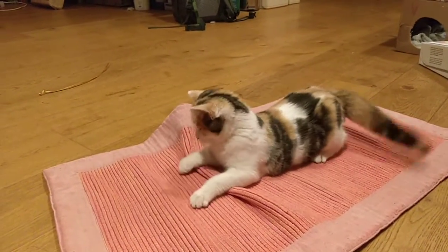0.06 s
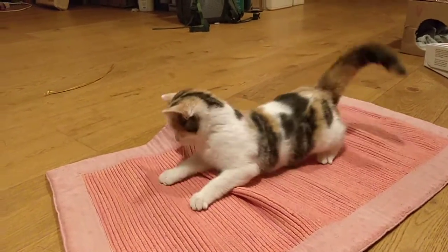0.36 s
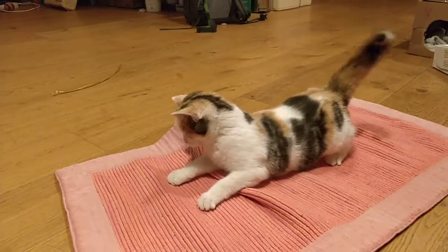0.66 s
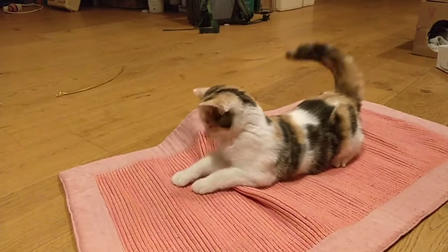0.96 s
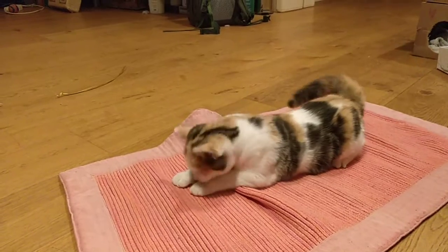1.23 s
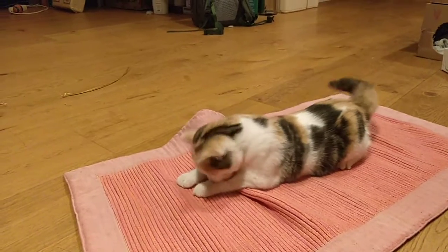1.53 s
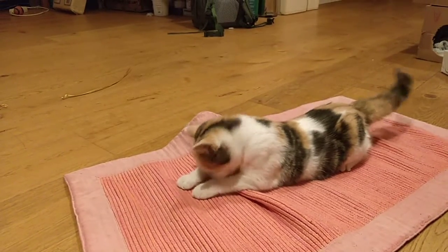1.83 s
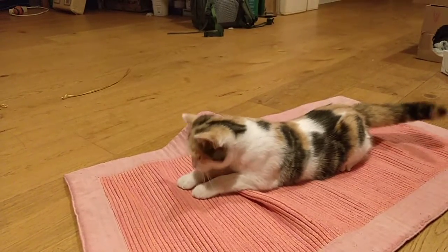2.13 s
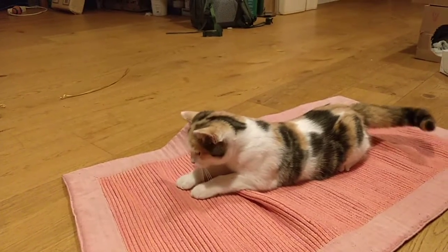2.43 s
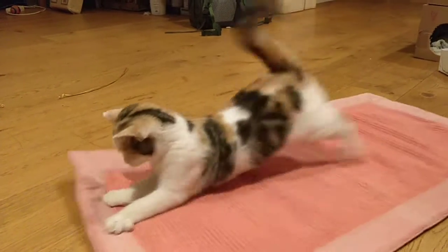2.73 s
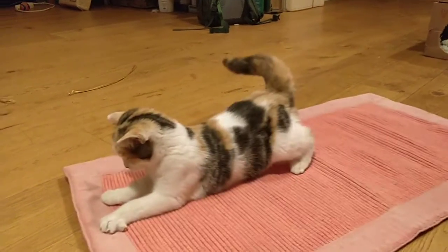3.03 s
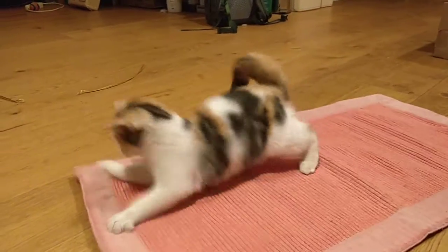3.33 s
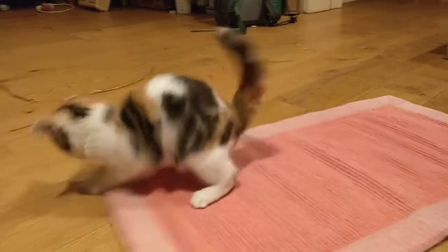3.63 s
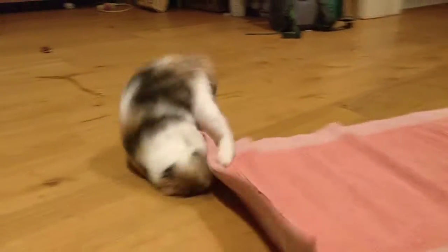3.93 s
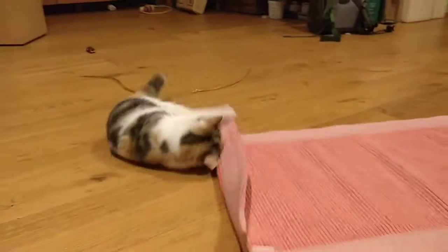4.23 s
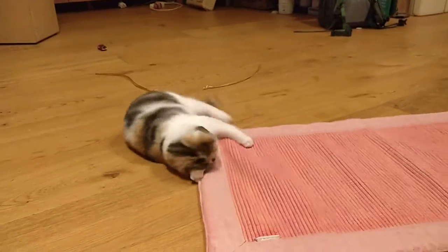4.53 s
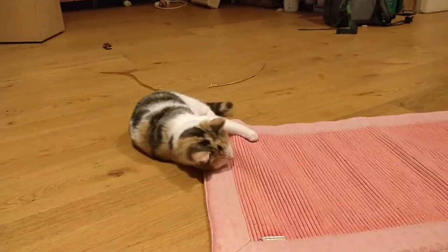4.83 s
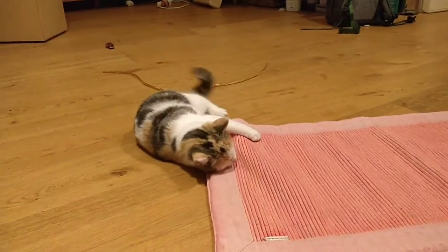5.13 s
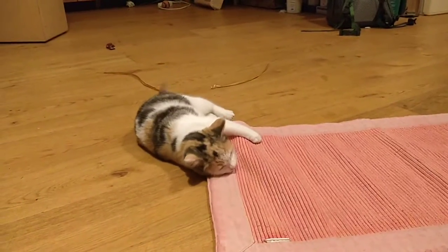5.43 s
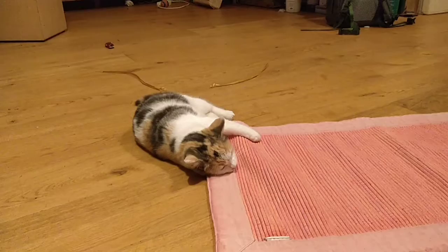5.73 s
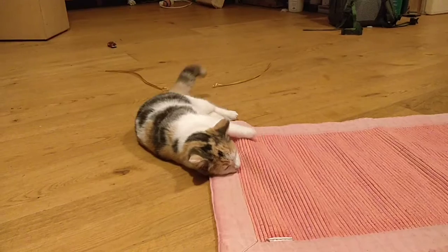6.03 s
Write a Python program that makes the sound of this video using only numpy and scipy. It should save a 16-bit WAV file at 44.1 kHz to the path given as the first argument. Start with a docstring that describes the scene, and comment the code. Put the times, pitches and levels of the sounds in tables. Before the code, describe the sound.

In a quiet, slightly reverberant room, irregular finger snaps sound near the microphone while a kitten shifts faintly on a rug. The kitten then leaps and scrabbles, with short claw scratches, rustling fabric and dull knocks on the wooden floor, the heaviest as it rolls over. It settles with light brushes of fur, and the nearby fingers snap a few more times.

```python
"""Kitten on a rug

A kitten pounces on a woven rug, drags it and rolls over on a wooden floor in a fairly live room.
Friction makes claws rasp, cloth rustle and fur brush; paws and body excite the modes of the boards.
Close to the microphone, fingers snap for its attention: skin slips, then cavities of the hand resonate."""
import sys
import numpy as np
from scipy import signal
from scipy.fft import rfft, irfft
from scipy.io import wavfile

SR = 44100
rng = np.random.default_rng(int(sys.argv[2]) if len(sys.argv) > 2 else 0)


def waveform_to_disk(signal):
    """Save audio, clipped to [-1, 1], as 16-bit WAV at the path in sys.argv[1]."""
    frames = np.transpose(np.atleast_2d(signal))
    scaled = np.clip(frames, -1, 1) * 32767
    samples = np.round(scaled).astype(np.int16)
    wavfile.write(sys.argv[1], SR, samples)


N = 276066

# Levels are relative within each source. A rasp's nominal f scales its spectrum in frequency.
# room air spectrum: f/Hz, level/dB
AIR = [(15, -68), (25, -9.5), (144, -2), (179, -6), (234, -6.5), (268, -4.5), (315, -5.5), (460, -6.5),
       (541, -5), (653, -8.5), (811, -9), (4200, -13), (4810, -14.5), (8030, -24.5), (15800, -24.5)]
# reverberation time: f/Hz, T60/s
ROOM_T60 = [(60, 0.7), (200, 0.66), (600, 0.77), (1500, 0.72), (3000, 0.3), (6000, 1), (10000, 0.32),
            (16000, 0.32)]
# left-right coherence of the diffuse field: f/Hz, coherence
COHERENCE = [(100, 0.72), (250, 0.46), (500, 0.64), (1000, 0.02), (2000, 0), (16000, 0.09)]
# sensitivity of the right microphone port over the left: f/Hz, gain/dB
RIGHT_LIFT = [(60, 3), (300, 5), (800, 3), (3000, 1.95), (6500, 2.5), (8200, 7.5), (9300, 11), (10800, 3.5),
              (13500, 1)]

# finger snaps: t/s, level/dB, palm cavity f/Hz, preceding slip time/s
SNAPS = [(0.3025, -48, 2130, 0.0042), (0.3738, -51.5, 2320, .008), (0.4849, -48.5, 2200, 0.0045),
         (0.8955, -51, 2270, 0.0099), (1.4065, -52, 2420, 0.0067), (1.7218, -49, 2610, 0.0062),
         (1.974, -63.5, 2530, 0.01), (2.4046, -51, 2460, 0.0076), (2.49, -56.5, 3000, .011),
         (4.2182, -49.5, 2560, 0.017), (4.7489, -50.5, 2520, 0.0073), (5.3748, -38.5, 2880, .009),
         (5.7333, -50, 2500, 0.0091)]
# slips that miss the palm: t/s, level/dB, slip time/s, nominal f/Hz
FUMBLES = [(1.596, 0.5, 0.0096, 10200), (1.953, -4.5, 0.0073, 8600), (1.9665, 2, .005, 8700),
           (2.079, -6.5, 0.0044, 8300), (2.607, -1, 0.017, 10300), (5.628, 2, .009, 9400)]
# modes of the hand: f/Hz, level/dB, T60/s
HAND_MODES = [(2170, 5, 0.0031), (2803, -6, 0.012)]

# fur brushing the floor: t/s, level/dB, swell time/s, nominal f/Hz
BRUSHES = [(2.633, -47, 0.015, 1980), (3.9, -50, 0.011, 980), (4.715, -51, 0.0066, 675),
           (5.081, -51, 0.014, 890), (6.066, -71, 0.0069, 933)]
# weight shifting on the rug: t/s, level/dB, duration/s
SHIFTS = [(0.27, -65.5, 0.093), (0.48, -64, 0.077), (1.595, -57, 0.025), (1.71, -59, 0.069)]
# tugs on the rug: t/s, duration/s, rubbing level/dB, fold level/dB
TUGS = [(2.579, 0.095, -46.5, -62), (2.683, 0.12, -54.5, -51.5), (2.789, 0.056, -49, -52),
        (3.343, 0.35, -58.5, -62), (3.438, 0.16, -53.5, -50.5), (3.545, 0.1, -54.5, -71),
        (3.655, 0.35, -55.5, -58.5), (3.954, 0.18, -47, -48), (4.154, 0.17, -53, -57),
        (4.444, 0.15, -56.5, -50)]
# paws and body landing: t/s, knock level/dB, weight level/dB
LANDINGS = [(0.246, -54, -63), (0.361, -47, -62), (0.818, -60, -71), (2.695, -30, -46), (2.736, -36, -44.5),
            (2.831, -46.5, -48), (2.852, -44.5, -46.5), (3.222, -64, -65), (3.326, -55, -73),
            (3.415, -42, -44.5), (3.486, -43.5, -42.5), (3.516, -37, -39.5), (3.616, -30.5, -28.5),
            (3.748, -35, -52), (3.805, -36, -56), (3.934, -22, -32), (3.969, -53, -34), (4.063, -38.5, -47),
            (4.207, -33, -39.5), (4.432, -38, -53), (4.48, -43, -48.5), (4.509, -41, -50),
            (4.57, -39.5, -50.5)]
# modes of the floorboards: f/Hz, level/dB, T60/s
BOARD_MODES = [(54, -16.5, 0.43), (89.5, -21, 0.38), (109, -14, 0.38), (115.7, -2, 0.14), (133, -37, 0.057),
               (164.5, -7, 0.11), (252.5, -6, 0.1), (271, -11, 0.057), (314, -5.5, 0.019),
               (420, 0.5, 0.006), (554, -4.5, 0.037), (653, -12, 0.068), (837, -5.5, 0.05),
               (967, -0.5, 0.021), (1225, -1, 0.008), (1550, -3.5, 0.03), (1820, -6.5, 0.0013),
               (2280, 6, 0.033)]
# claws tearing through the weave: t/s, level/dB, nominal f/Hz
TEARS = [(2.6949, -46, 2660), (3.4581, -39, 3530), (3.491, -35.5, 3780), (3.511, -29.5, 3430),
         (3.606, -41, 3030), (3.6421, -33, 4100), (3.7186, -39, 3070), (4.04, -35, 8200),
         (4.045, -30.5, 3740), (4.2, -57, 2880), (4.428, -47, 3360)]
# claw tips ticking on the floor: t/s, level/dB, nominal f/Hz
TICKS = [(0.2466, -54.5, 1240), (2.8517, -41, 1710), (3.2221, -43, 2800), (3.3274, -48, 3480),
         (3.494, -29, 3770), (3.7468, -37, 1700), (3.861, -48, 7100), (3.9925, -43, 7600)]

# friction spectra at the usual sliding speed: f/Hz, level/dB
SKIN = [(450, -36), (1500, -5), (2900, -7), (4800, -9), (6200, -15.5), (9000, -10), (11700, -16),
        (16000, -29)]
FUR = [(40, -55), (200, -8), (500, -5.5), (1000, -4), (2000, -7.5), (4500, -19), (16000, -44)]
CLOTH = [(500, -14.5), (1200, -3.5), (2800, 2), (4500, -4), (7000, -13), (10000, -16), (13000, -25),
         (16000, -70)]
FOLDS = [(30, -34), (65, 19.5), (120, 22.5), (210, 11.5), (400, 2), (800, 8), (1400, -38), (3000, -58),
         (8000, -18)]
WEAVE = [(400, -23), (1400, -26.5), (2800, -3.5), (4400, 3.5), (6400, -9.5), (10000, -25), (16000, -33)]
RUMBLE = [(50, -18), (140, 5), (230, -16), (380, -6.5), (700, -44), (2000, -54)]


def from_db(db):
    """Amplitude grows tenfold per 20 dB."""
    return 10 ** (np.asarray(db) / 20)


def unit_rms(x):
    """Normalisation to unit mean power."""
    return x / np.sqrt(np.mean(x ** 2) + 1e-20)


def at_hz(points, hz):
    """Interpolation on a log-frequency axis."""
    freqs, values = np.array(points).T
    return np.interp(np.log(np.maximum(hz, 1)), np.log(freqs), values)


def colour(x, spectrum):
    """Zero-phase filtering by a spectrum in dB."""
    size = x.shape[-1]
    return irfft(rfft(x) * from_db(at_hz(spectrum, np.fft.rfftfreq(size, 1 / SR))), size)


def butter(x, order, hz, kind="low"):
    """Butterworth filtering: a maximally flat passband."""
    return signal.sosfilt(signal.butter(order, hz, kind, fs=SR, output="sos"), x)


def add(track, s, sound):
    """Superposition of a sound at time s."""
    i = max(round(s * SR), 0)
    track[i:i + len(sound)] += sound[:N - i]


def delay(x, s):
    """Travel time as a circular shift."""
    return np.roll(x, round(s * SR))


def ring(hz, t60, size=2048):
    """Free vibration of a damped mode."""
    t = np.arange(size) / SR
    return np.sin(2 * np.pi * hz * t) * np.exp(-np.log(1000) * t / t60)


def diffuse(size):
    """A diffuse field is coherent between two ports only at long wavelengths."""
    coherence = np.clip(at_hz(COHERENCE, np.fft.rfftfreq(size, 1 / SR)), 0, 1)
    mid, side = rfft(rng.standard_normal((2, size)))
    spectra = np.sqrt((1 + coherence) / 2) * mid + np.sqrt((1 - coherence) / 2) * side * [[1], [-1]]
    return irfft(spectra, size)


def room_air():
    """Steady diffuse noise forms a quiet background."""
    return from_db(-69.5) * unit_rms(colour(diffuse(N), AIR))


def room_tail(build_s=0.0029, size=24576):
    """Reflections build up quickly, then each octave decays exponentially at its own rate."""
    t, hz = np.arange(size) / SR, np.fft.rfftfreq(size, 1 / SR)
    noise, tail = rfft(diffuse(size)), 0
    for centre in np.geomspace(125, 16000, 8):
        octave = np.clip(1 - abs(np.log2(np.maximum(hz, 100) / centre)), 0, 1)
        decay = np.exp(-np.log(1000) * t / at_hz(ROOM_T60, centre))
        tail += irfft(noise * octave, size) * decay
    tail *= 1 - np.exp(-(t / build_s) ** 2)
    return tail / np.sqrt(np.sum(tail ** 2) / 2)


def reverberation(feed, changes=6):
    """Reflections vary with position: for a hand-held microphone, one response fades into the next."""
    feed = butter(feed, 2, 209, "high")
    out, hop = np.zeros((2, N)), N // changes + 1
    for start in range(-hop, N, hop):
        span = np.arange(max(start, 0), min(start + 2 * hop, N))
        piece = feed[span] * np.sin(np.pi * (span - start) / (2 * hop))
        for side, echo in zip(out, signal.fftconvolve(piece[None], room_tail())):
            add(side, span[0] / SR, echo)
    return out


def near_reflections(x):
    """Echoes from two near surfaces interfere with the direct sound."""
    return x + from_db(-6.5) * delay(x, 0.002003) + from_db(-11) * delay(x, 0.0074)


def place(x, lag_s):
    """A path difference brings direct sound to the right port later."""
    return np.array([x, delay(x, lag_s)])


def friction(spectrum, per_s, spread_db, size=N):
    """Stick-slip friction is a random train of tiny, uneven catches."""
    heights = from_db(spread_db * np.minimum(rng.exponential(1, size), 3))
    signs = rng.choice([-1, 1], size)
    catches = rng.random(size) < per_s / SR
    return unit_rms(colour(heights * signs * catches, spectrum))


def rasps(strokes, grain, usual_hz, per_s, spread_db):
    """Friction swells and fades in each stroke; faster sliding shifts its spectrum upward."""
    out, t = np.zeros(N), np.arange(4096) / SR
    for s, db, swell_s, nominal_hz in strokes:
        age = t / swell_s
        spectrum = [(hz * nominal_hz / usual_hz, level) for hz, level in grain]
        add(out, s, from_db(db) * age * np.exp(1 - age) * friction(spectrum, per_s, spread_db, len(t)))
    return out


def finger_slips(creep_lead_s=0.012, creep_swell_s=0.0064, usual_slip_s=0.0067, slip_hz=9120):
    """Skin creeps, then slips on skin, releasing the same energy however quick the slip."""
    tries = [(s, 0, slip_s, slip_hz) for s, _, _, slip_s in SNAPS] + FUMBLES
    strokes = []
    for s, db, slip_s, hz in tries:
        slip_db = db - 36.5 - 10 * np.log10(slip_s / usual_slip_s)
        strokes.append((s - slip_s - creep_lead_s, db - 49, creep_swell_s, hz))
        strokes.append((s - slip_s, slip_db, 0.3 * slip_s, hz))
    return from_db(-12) * rasps(strokes, SKIN, usual_hz=9470, per_s=11000, spread_db=10)


def finger_snaps(cupped_hz=2633, ring_s_per_hz=7e-6):
    """Impact on the palm excites two cavity resonances: a small pocket and the hollow of the hand."""
    pops, hollows = np.zeros((2, N))
    hand = sum(from_db(db) * ring(hz, t60) for hz, db, t60 in HAND_MODES)
    for s, db, cavity_hz, _ in SNAPS:
        # a well-cupped hand rings higher and longer, with less bite and more hollow
        excess_hz = max(cavity_hz - cupped_hz, 0)
        cavity = ring(cavity_hz, t60=0.008 + ring_s_per_hz * excess_hz)
        bite = from_db(9 - 0.3 * excess_hz) * ring(hz=4190, t60=0.002)
        hollow = from_db(-6.5 + 0.026 * (cavity_hz - cupped_hz)) * ring(hz=1470, t60=0.005)
        add(pops, s, from_db(db) * (hand + cavity - bite))
        add(hollows, s, from_db(db) * hollow)
    # soft flesh rounds the impact, and a hand is too small to radiate bass
    return from_db(14.5) * butter([pops, hollows], 7, [930, 5960], "band")


def fur_and_pads(skid_lag_s=0.011, skid_swell_s=0.005, skid_hz=760, usual_knock_db=-35.5):
    """Soft friction: fur brushes the floor, and pads skid louder after a harder landing."""
    skids = [(s + skid_lag_s, -48 + 0.92 * (knock_db - usual_knock_db), skid_swell_s, skid_hz)
             for s, knock_db, _ in LANDINGS]
    return from_db(-3.5) * rasps(BRUSHES + skids, FUR, usual_hz=930, per_s=3500, spread_db=4)


def pressure(strokes, rise_s=0.012):
    """Contact pressure rises quickly and relaxes over each stroke's duration."""
    out, t = np.zeros(N), np.arange(SR // 2) / SR
    for s, db, length_s in strokes:
        add(out, s, from_db(db) * (1 - np.exp(-t / rise_s)) * np.exp(-(t / length_s) ** 2))
    return out


def rug(jerks_per_s=55, jerk_db=5):
    """Friction follows pressure in jerks: threads rub, heavy folds flop and shifting weight rumbles."""
    threads = friction(CLOTH, per_s=5000, spread_db=4)
    folds = friction(FOLDS, per_s=1300, spread_db=3.5)
    rumble = friction(RUMBLE, per_s=700, spread_db=0)
    threads *= from_db(-3) * pressure([(s, db, length_s) for s, length_s, db, _ in TUGS])
    folds *= from_db(-4) * pressure([(s, db, length_s) for s, length_s, _, db in TUGS])
    rumble *= from_db(-6.5) * pressure(SHIFTS, rise_s=0.015)
    knots = rng.standard_normal(N // 20)
    jerks = unit_rms(np.interp(np.arange(N) / SR * jerks_per_s, np.arange(len(knots)), knots))
    return (threads + folds + rumble) * from_db(jerk_db * jerks)


def floorboards(pad_hz=168, knock_low_hz=390, contact_hz=1600):
    """Contact hardness sets bandwidth: pads drive the low modes, claw or bone the higher ones."""
    push, knock = np.zeros((2, N))
    for s, knock_db, weight_db in LANDINGS:
        modes = 0
        for k, (hz, db, t60) in enumerate(BOARD_MODES):
            # every spot on the floor rings a little differently
            spot_db, detune = rng.normal(0, [2, 0.087])
            polarity = (-1) ** (k // 2)
            modes += polarity * from_db(db + spot_db) * ring(hz * (1 + detune), t60, size=16384)
        add(push, s, from_db(weight_db + 2.5) * modes)
        top_hz = contact_hz * from_db(0.27 * max(knock_db + 33.5, 0))   # hard blows are brighter
        add(knock, s, from_db(knock_db - 6.5) * butter(modes, 2, [knock_low_hz, top_hz], "band"))
    thumps = butter(push, 2, pad_hz) + knock
    return butter(thumps, 2, 48, "high")   # little radiates below the lowest mode


def claws(usual_hz=4170, usual_swell_s=0.0035, tick_swell_s=0.0003):
    """A claw crosses a few threads, so speed sets pitch and duration; a tick is nearly an impulse."""
    tears = [(s, db, usual_swell_s * usual_hz / hz, hz) for s, db, hz in TEARS]
    ticks = [(s, db, tick_swell_s, hz) for s, db, hz in TICKS]
    scratches = from_db(-0.5) * rasps(tears + ticks, WEAVE, usual_hz, per_s=3600, spread_db=2)
    return butter(scratches, 3, 10500)   # soft threads give little high treble


def scene():
    """Direct and reverberant fields add: fingers near on the left, the kitten ahead, air all around."""
    pops, hollows = finger_snaps()
    slips = finger_slips()
    rustle = claws() + fur_and_pads()
    thumps = floorboards()
    rustle += rug()
    hand = place(near_reflections(pops) + slips, lag_s=17 / SR)
    kitten = place(rustle + thumps, lag_s=7 / SR)
    # the hollow of the hand faces away and is heard only through the room
    feed = from_db(1) * pops + hollows + from_db(2.5) * slips
    feed += from_db(-6) * rustle + from_db(-7) * thumps
    return room_air() + reverberation(feed) + hand + kitten


def record(dry, cutoff_hz=15600):
    """The microphone is band-limited; its right port is more sensitive and resonates in the treble."""
    ports = np.array([dry[0], colour(dry[1], RIGHT_LIFT)])
    return signal.sosfilt(signal.ellip(10, .1, 80, cutoff_hz, fs=SR, output="sos"), ports)


dry = scene()
out = record(dry)
waveform_to_disk(out)
```